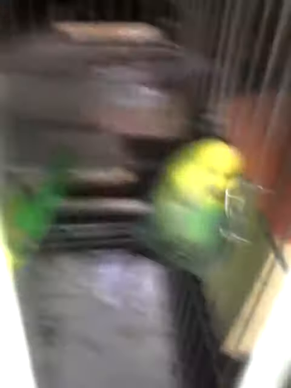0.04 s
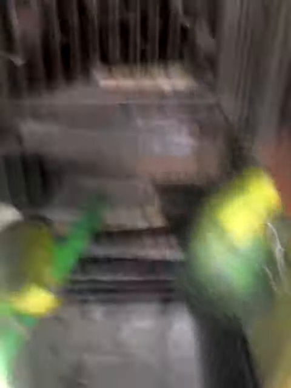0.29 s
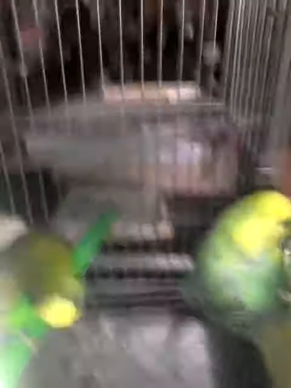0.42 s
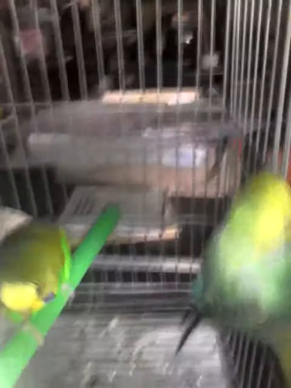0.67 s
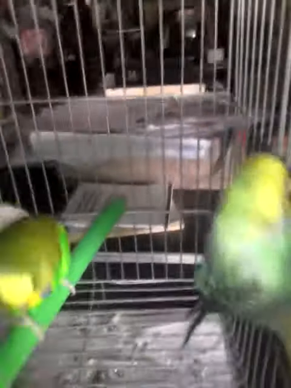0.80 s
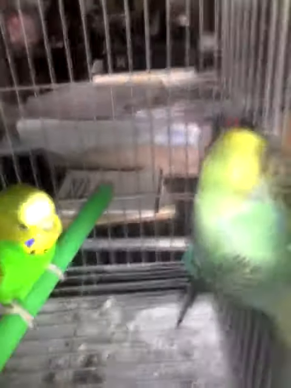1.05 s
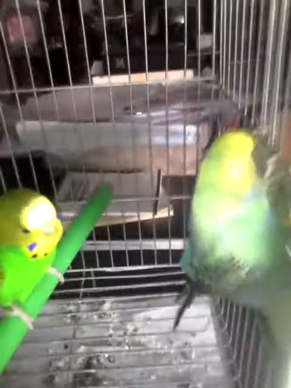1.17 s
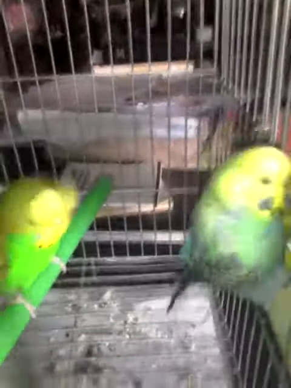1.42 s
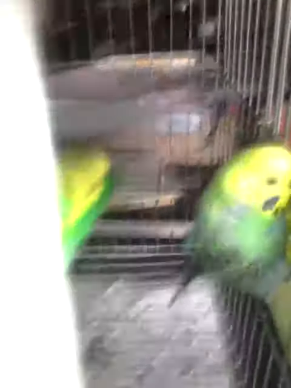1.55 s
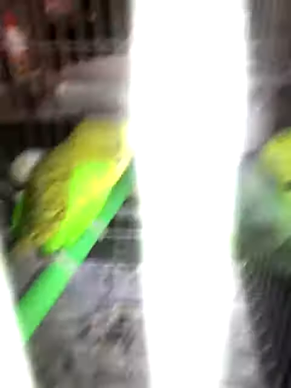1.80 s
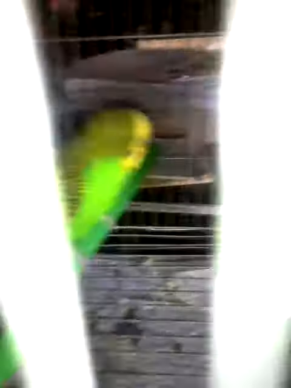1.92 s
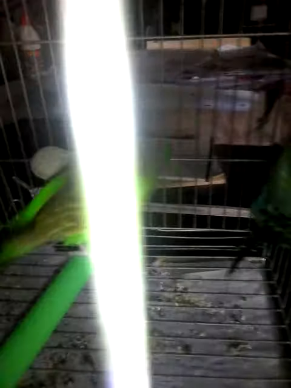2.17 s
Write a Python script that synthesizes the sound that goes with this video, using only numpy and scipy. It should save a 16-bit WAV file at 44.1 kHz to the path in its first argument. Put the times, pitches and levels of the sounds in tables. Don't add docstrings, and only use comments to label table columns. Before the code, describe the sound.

A budgerigar gives one harsh chirping squawk in a small room while a hand rubs the phone

```python
import sys
import numpy as np
from scipy import signal
from scipy.io import wavfile
from scipy.ndimage import uniform_filter1d

SR = 44100
rng = np.random.default_rng(int(sys.argv[2]) if len(sys.argv) > 2 else 0)


def store_pcm(level_fs):
    pcm = np.round(np.clip(level_fs, -1, 1) * 32767).astype(np.int16)
    wavfile.write(sys.argv[1], SR, np.atleast_2d(pcm).T)


def volts_from_db(level):
    exponent = np.asarray(level, float) / 20
    return 10 ** exponent


N = 99225
T = np.arange(N) / SR


def evened(x):
    return x / np.sqrt(np.mean(x ** 2) + 1e-20)


def curve(rows, column=1):
    rows = np.array(rows)
    return np.interp(T, rows[:, 0], rows[:, column], right=-140)


def drift(size):
    return evened(signal.oaconvolve(rng.standard_normal(N), np.hanning(size), "same"))


def resonate(x, hz, width):
    turn = np.exp(2j * np.pi * hz * T)
    r = np.exp(-np.pi * width / SR)
    smooth = signal.lfilter([1 - r], [1, -r], x / turn + 1e-18)
    return 2 * (turn * smooth).real


def noise(*colours, patchy_db=0., tilt_db=None):
    frames = N // 128 + 5
    hz = np.fft.rfftfreq(512, 1 / SR)
    real, imag, patches = rng.standard_normal((frames, 257, 3)).T
    patches = uniform_filter1d(patches, size=5, axis=0)
    patches = evened(uniform_filter1d(patches, size=8, axis=1))
    gain = 0
    for colour in colours:
        f, db = np.array(colour).T
        gain = gain + volts_from_db(np.interp(np.log(hz + 1), np.log(f), db, left=-70, right=-90))
    lean = 0
    if tilt_db is not None:
        octaves = np.log2(np.clip(hz, 1500, 6000) / 6000)
        lean = octaves[:, None] * np.pad(tilt_db[::128], (0, 5), "edge")[:frames]
    spectra = (real + 1j * imag) * gain[:, None] * volts_from_db(patchy_db * patches + lean)
    return evened(signal.istft(spectra, nperseg=512, noverlap=384)[1][:N])


# t/s, level/dB
HUM_LEVEL = [
    (0, -65.5),
    (.12, -60.5),
    (1.57, -62),
    (1.61, -69),
    (1.75, -81.5),
    (1.92, -80.5),
    (2.0, -65),
    (2.15, -71.5),
    (2.25, -63),
]
# t/s, level/dB
RUMBLE_LEVEL = [(0, -64.5), (.1, -78), (.22, -52.5), (.36, -72.5), (.5, -58.5), (.58, -64.5), (.7, -54.5),
                (.85, -64.5), (1.3, -65.5), (1.55, -65.5), (1.68, -66.5), (1.8, -67.5), (1.87, -85),
                (2.25, -73.5)]
# f/Hz, level/dB per Hz
HISS_COLOUR = [(15, -30), (60, -6.5), (300, -7.5), (900, -18.5), (3450, -24.5), (6900, -27.5), (8200, -38),
               (15600, -41.5)]


def house():
    air = rng.standard_normal(N)
    low = evened(resonate(resonate(air, 594.4, 187), 594.4, 187))
    high = evened(resonate(resonate(air, 1834, 120), 1834, 120))
    hum = low + volts_from_db(-15) * high
    band = signal.butter(2, [70, 200], "band", fs=SR, output="sos")
    rumble = evened(signal.sosfilt(band, rng.standard_normal(N)))
    hiss = volts_from_db(-71) * noise(HISS_COLOUR, patchy_db=0.8)
    return volts_from_db(curve(HUM_LEVEL)) * hum + volts_from_db(curve(RUMBLE_LEVEL)) * rumble + hiss


# t/s, level/dB, tilt/dB per octave
RUSTLE_LEVEL = [(0, -58, -3.5), (.11, -57, 0.5), (.18, -61, -6), (.25, -56.5, -1.5), (.42, -56, -3.5),
                (.51, -59, -1), (.6, -53, -3.5), (.68, -55.5, -5.5), (.85, -54, -3), (1.12, -60, -6),
                (1.24, -72, 4.5), (1.3, -62, 3.5), (1.38, -62.5, -1.5), (1.52, -83.5, 5.5), (1.62, -83, 11)]
# f/Hz, level/dB
RUSTLE_BODY = [(1500, -21), (2000, -15.5), (2700, -8.5), (3600, -5.5), (4700, -6.5), (6400, -2.5),
               (7300, -16), (8000, -29.5)]
# f/Hz, level/dB
RUSTLE_AIR = [(7000, -60), (8200, -37), (9800, -35), (11500, -40.5), (15000, -47)]


def rustle():
    tilt_db = np.clip(curve(RUSTLE_LEVEL, column=2), -9, 9)
    hiss = noise(RUSTLE_BODY, RUSTLE_AIR, patchy_db=2.5, tilt_db=tilt_db)
    return volts_from_db(curve(RUSTLE_LEVEL) + 4.5) * hiss


# t/s, peak level/dB, f/Hz
SKIN_CATCHES = [(0.121, -35.5, 512), (0.175, -39.5, 476), (0.218, -33, 522), (0.228, -33.5, 518),
                (0.244, -35.5, 749), (0.261, -38, 768), (0.407, -35, 616), (0.467, -32, 776),
                (0.596, -34.5, 871), (0.623, -28.5, 704), (0.634, -24.5, 497.6), (0.65, -27.5, 802),
                (0.664, -28, 495), (0.678, -27, 476), (0.696, -24.5, 687), (0.708, -25, 845),
                (0.721, -22, 673), (0.731, -24, 729), (0.744, -25, 708), (0.762, -23, 712),
                (0.789, -25, 696), (0.816, -27, 683), (0.836, -27.5, 790), (0.855, -26.5, 737),
                (0.881, -27, 707), (0.925, -27.5, 834), (0.998, -36, 746), (1.042, -33.5, 740),
                (1.083, -34.5, 807), (1.197, -36, 712), (1.216, -32, 697), (1.354, -28.5, 793),
                (1.362, -26.5, 735), (1.375, -28.5, 745), (1.397, -35.5, 761), (1.42, -37.5, 758),
                (1.446, -33, 825), (1.464, -37.5, 764), (1.482, -38, 851), (1.497, -38, 735),
                (1.538, -35.5, 832), (1.558, -29, 750), (1.573, -35, 792), (1.582, -37, 767),
                (1.618, -48, 579), (2.23, -52.5, 630)]


def catches(grip):
    rise_s, t60_s, top_hz, top_db, top_t60_s = 0.004, 0.031, 2000, -13.5, 0.052
    out = np.zeros(N + 4000)
    t = T[:4000]
    rise = np.sin(np.pi / 2 * np.minimum(t / rise_s, 1)) ** 2
    decay = volts_from_db(-60 * (np.maximum(t - rise_s, 0) / t60_s) ** 2)
    for start, db, hz in SKIN_CATCHES:
        at = round(start * SR)
        phase, top_phase = 2 * np.pi * rng.random(2)
        main = decay * np.sin(2 * np.pi * hz * t + phase)
        top = volts_from_db(top_db - 60 * t / top_t60_s) * np.sin(2 * np.pi * top_hz * t + top_phase)
        out[at:at + 4000] += volts_from_db(db - 3) * rise * (main + grip[at] * top)
    return out[:N]


# t/s, peak level/dB, f/Hz
HAND_THUMPS = [
    (0.209, -48, 135),
    (0.448, -57, 128),
    (0.672, -35, 149.5),
    (0.757, -34.5, 252),
    (0.967, -46.5, 79),
    (1.101, -46, 144),
    (1.351, -37.5, 140),
    (1.462, -46.5, 246),
]


def thumps():
    out = np.zeros(N)
    t = T[:6000]
    for start, db, hz in HAND_THUMPS:
        body = volts_from_db(db - 60 * t / 0.1) * np.sin(2 * np.pi * hz * t)
        out[round(start * SR):][:6000] += body * np.minimum(t / 0.0067, 1) ** 2
    return out


# t/s, length/s, level/dB, grip (0 loose to 1 tight)
RUB_STROKES = [(0.115, 0.02, -42, 0.11), (0.143, 0.049, -45.5, 0.065), (0.196, 0.072, -38.5, 0.52),
               (0.27, 0.12, -53, 0.29), (0.389, 0.085, -34.5, 0.59), (0.482, 0.094, -47.5, 0.11),
               (0.577, 0.026, -45, .5), (0.593, 0.051, -38.5, 0.38), (0.627, 0.059, -30.5, 0.38),
               (0.688, 0.059, -28, 0.53), (0.75, 0.058, -31.5, 0.59), (0.805, 0.041, -35.5, 0.93),
               (0.848, 0.12, -33.5, 0.83), (0.965, 0.12, -41, 0.82), (1.089, 0.061, -48, 0.94),
               (1.147, 0.057, -42, 0.93), (1.194, 0.072, -41.5, 0.69), (1.276, 0.06, -51, 0.6),
               (1.331, 0.018, -45.5, 0.93), (1.351, 0.036, -36.5, 1), (1.397, 0.063, -44.5, 0.9),
               (1.444, 0.075, -46, 0.78), (1.528, 0.017, -46.5, 0.96), (1.55, 0.015, -36.5, 0.99),
               (1.57, 0.015, -45, 0.95), (1.615, .006, -51.5, 0.58)]
# f/Hz, width/Hz, loose-grip level/dB, tight-grip level/dB
SHELL_MODES = [(503, 60.4, 10, -7.5), (620, 120, -14.5, -18.5), (713.6, 72.3, 0, 5), (794.7, 97, -3.5, 8),
               (885, 82, -3, -2.5), (948, 76, -9, -20), (1760, 160, -26, -20), (2080, 344, -19.5, -4),
               (2550, 600, -19.5, -14), (255, 44, -17.5, -11.5), (135, 28, -7, -26)]


def hand():
    slips_per_s, spread_db, rise_s, fall_s = 900, 2, 0.006, 0.011
    slips = volts_from_db(spread_db * np.minimum(rng.exponential(1, N), 4))
    slips *= rng.random(N) < slips_per_s / SR
    slips = evened(slips * rng.choice([-1., 1.], N))
    slips = evened(slips + 0.67 * rng.standard_normal(N))

    push, grip = np.zeros(N), np.zeros(N)
    for start, length, db, tightness in RUB_STROKES:
        rise = (T - start) / rise_s
        fall = (start + length - T) / fall_s + 1
        push += volts_from_db(db - 5.5) * np.clip(np.minimum(rise, fall), 0, 1)
        grip = np.where(T >= start, tightness, grip)
    grip = uniform_filter1d(grip, size=200)

    ring = np.zeros(N)
    for hz, width, loose_db, tight_db in SHELL_MODES:
        mode = resonate(resonate(slips * push, hz, 1.71 * width), hz, 1.71 * width)
        ring += volts_from_db(loose_db + (tight_db - loose_db) * grip) * mode * np.sqrt(SR / width) / 4
    ring = signal.lfilter(*signal.iirnotch(1480, 1480 / 355, SR), ring)
    ring = signal.lfilter(*signal.butter(4, 2900, fs=SR), ring)

    let_go_s, let_go_fall_s = 1.588, 0.0037
    before = (let_go_s - T) / let_go_fall_s + 1
    after = (T - let_go_s - .024) / let_go_fall_s
    damped = np.clip(np.maximum(before, after), .1, 1)
    return (ring + thumps() + catches(grip)) * damped


def room(x):
    taps = np.zeros(SR // 2)
    at = np.arange(120, len(taps) - 20, 20)
    taps[at + rng.integers(0, 20, len(at))] = rng.choice([-1., 1.], len(at))
    t = T[:len(taps)]
    late = volts_from_db(-60 * t / 0.4)
    early = volts_from_db(0.5 - 60 * t / .11)
    taps *= np.minimum(t / 0.0089, 1) ** 2 * (late + early)
    dulled = signal.lfilter(*signal.butter(2, 6000, fs=SR), taps)
    return volts_from_db(-7.5) * signal.fftconvolve(x, dulled / np.linalg.norm(taps) * 1.67)[:N]


# t/s, peak level/dB
BEAK_CLICKS = [
    (0.8595, -41),
    (0.9175, -41),
    (0.9493, -39.5),
    (0.9756, -38),
    (0.9832, -35.5),
]


def beak():
    out = np.zeros(N)
    band = signal.butter(6, [2500, 6800], "band", fs=SR, output="sos")
    for start, db in BEAK_CLICKS:
        snap = signal.sosfilt(band, rng.standard_normal(200) * volts_from_db(-60 * T[:200] / .01))
        out[round(start * SR):][:200] += volts_from_db(db + 6) * snap
    return out


# t/s, length/s, start f/Hz, end f/Hz, level/dB
CALL_NOTES = [(.848, .006, 3450, 2970, -45), (0.859, .006, 2820, 3150, -37.5),
              (0.846, 0.008, 1480, 1450, -46.5), (0.863, 0.0055, 2180, 2350, -40),
              (.865, 0.013, 3560, 3680, -34), (0.878, 0.009, 3710, 3600, -28.5),
              (.868, .018, 7420, 7250, -54), (.933, .004, 3950, 3400, -35), (.890, 0.015, 3646, 3037, -34),
              (.889, 0.0062, 2190, 1670, -36), (0.895, 0.012, 1484, 1445, -42.5),
              (0.905, 0.02, 2760, 3057, -38), (0.907, 0.0172, 3670, 3770, -40),
              (0.916, 0.0033, 4400, 4800, -50), (.920, 0.023, 4090, 3976, -35.5),
              (0.938, 0.0069, 3535, 3250, -28.5), (.942, .007, 3300, 2950, -24.5),
              (1.010, .004, 2920, 3100, -38), (0.95, 0.0063, 2660, 2066, -28.5),
              (.948, .006, 5810, 4860, -44), (.950, .012, 3114, 2936, -31.5),
              (0.957, 0.014, 2080, 2063, -28), (0.972, 0.0028, 2065, 1892, -33),
              (0.979, 0.007, 2250, 2850, -27), (.975, 0.003, 3200, 3100, -33),
              (.987, 0.0099, 3008, 3080, -30.5), (.995, 0.0046, 3200, 3010, -30.5),
              (.999, 0.0056, 3124, 3180, -28.5), (1.004, 0.01, 3084, 2903, -36),
              (0.982, 0.0044, 4800, 5700, -41.5)]
# t/s, length/s, start f/Hz, end f/Hz, level/dB
ANSWER_NOTES = [(1.083, 0.0061, 3000, 3300, -44.5), (1.093, 0.0074, 3240, 2930, -41.5),
                (1.108, 0.016, 2596, 2300, -43.5), (1.125, .012, 2450, 2400, -47),
                (1.158, .012, 5150, 5350, -57.5), (1.123, 0.016, 3067, 2943, -41),
                (1.145, .014, 3650, 2900, -43.5), (1.160, 0.0078, 2600, 2700, -43),
                (.991, 0.0048, 4910, 5220, -42), (0.72, 0.0056, 5070, 4400, -52.5),
                (1.176, 0.013, 2850, 2445, -40), (1.3, 0.0075, 2276, 2260, -44),
                (1.204, 0.016, 2231, 2100, -40), (1.221, .014, 2200, 2150, -42.5),
                (1.273, 0.0038, 2120, 3200, -51.5), (1.240, .010, 2330, 2150, -50),
                (1.256, 0.01, 2092, 2020, -50)]


def bird():
    out = np.zeros(N)
    wobble = .016 * drift(size=120)
    rasp = 1 + .25 * drift(size=80)
    for start, length, hz0, hz1, db in CALL_NOTES + ANSWER_NOTES:
        at = slice(round(start * SR), round((start + length) * SR))
        u = (T[at] - start) / length
        hz = (hz0 + (hz1 - hz0) * u) * (1 + wobble[at])
        phase = 2 * np.pi * np.cumsum(hz) / SR
        tone = 0
        for k, overtone_db in enumerate([0, -33, -43]):
            tone = tone + volts_from_db(overtone_db + .4 * k * (db + 28)) * np.sin((k + 1) * phase)
        shape = np.clip(1.71 * np.sin(np.pi * u), 0, 1)
        out[at] += volts_from_db(db + 3) * shape * tone * rasp[at]
    return out + beak()


def scene():
    call = bird()
    return (house() + rustle() + hand() + call + room(call))[None]


def band_limit(x):
    return signal.sosfilt(signal.butter(12, 15500, fs=SR, output="sos"), x)


def record(dry):
    return band_limit(dry)


dry = scene()
out = record(dry)
store_pcm(out)
```